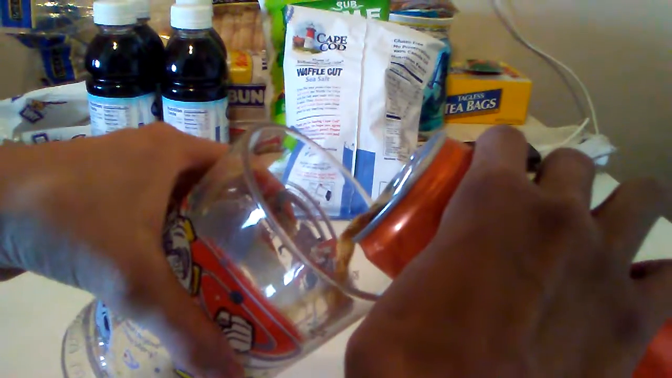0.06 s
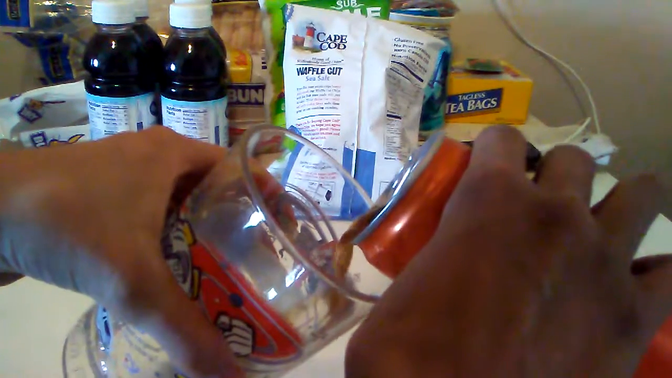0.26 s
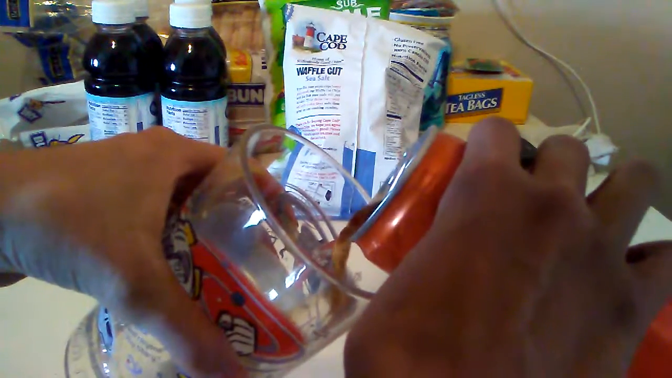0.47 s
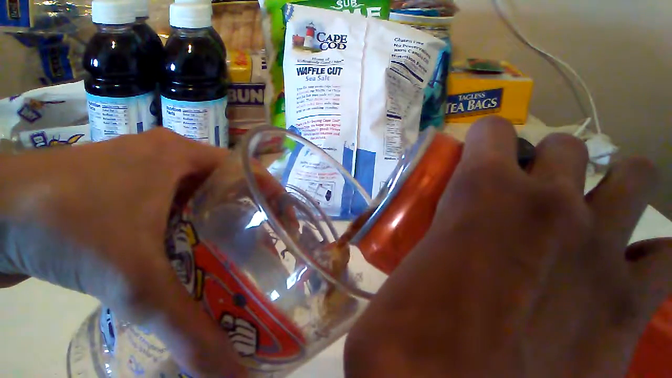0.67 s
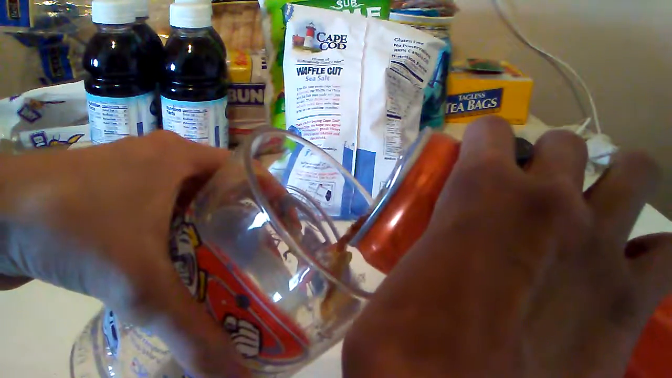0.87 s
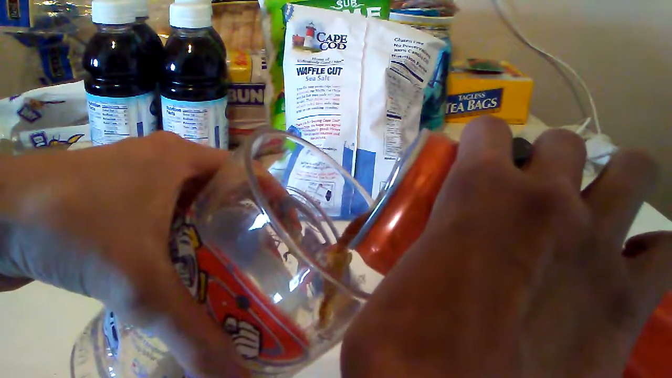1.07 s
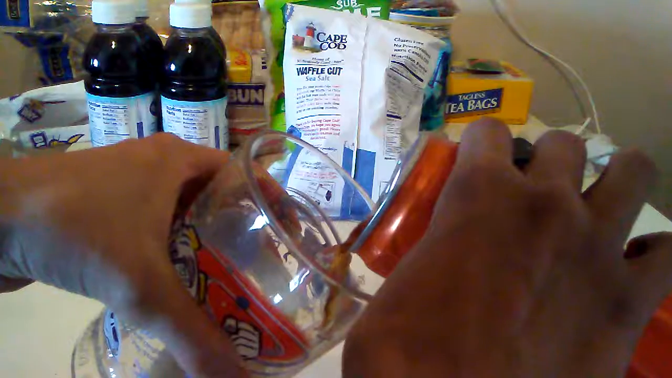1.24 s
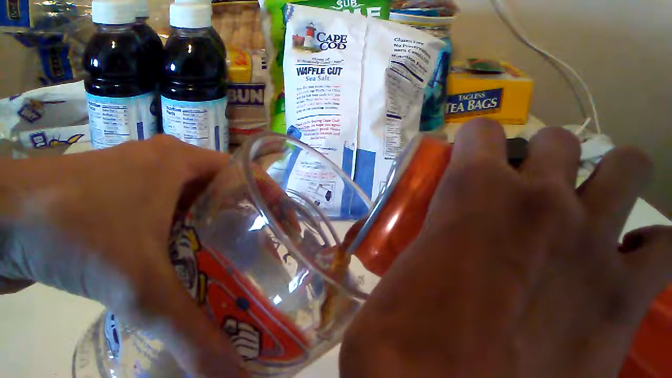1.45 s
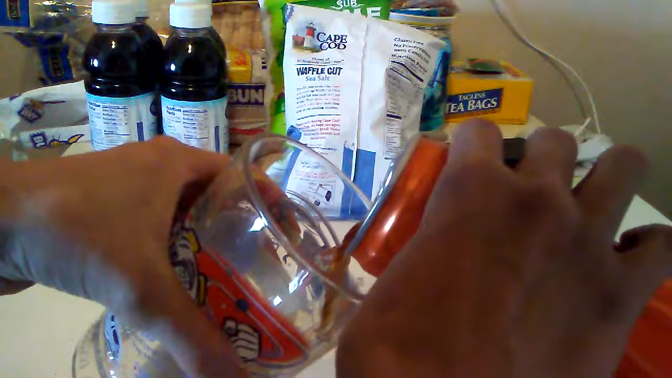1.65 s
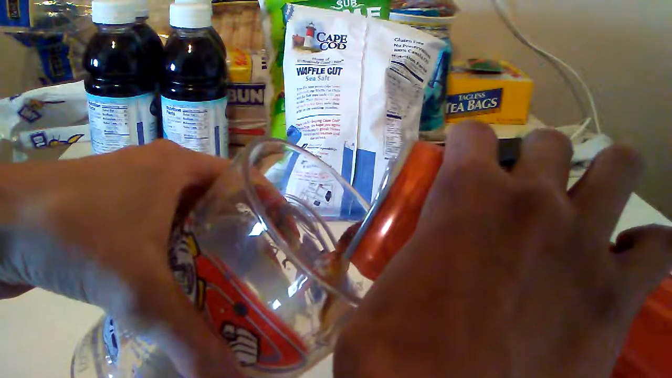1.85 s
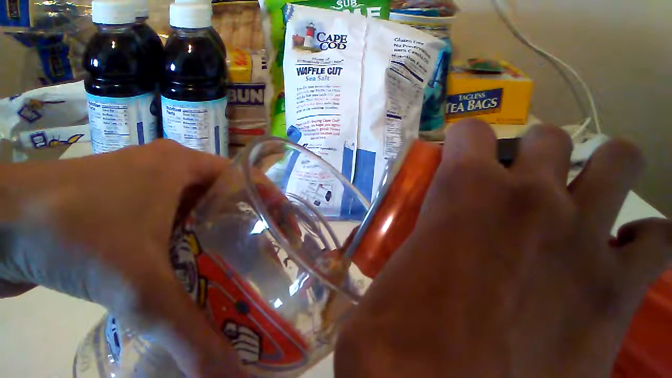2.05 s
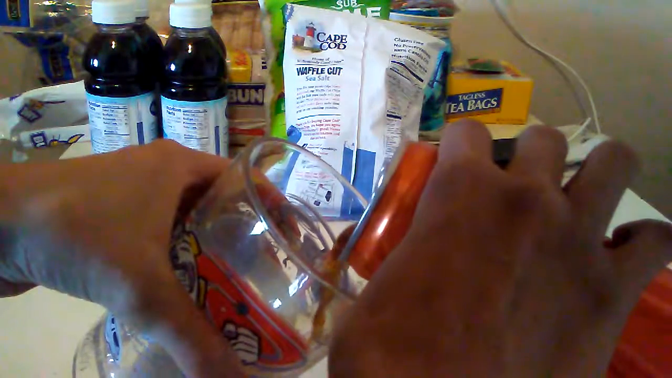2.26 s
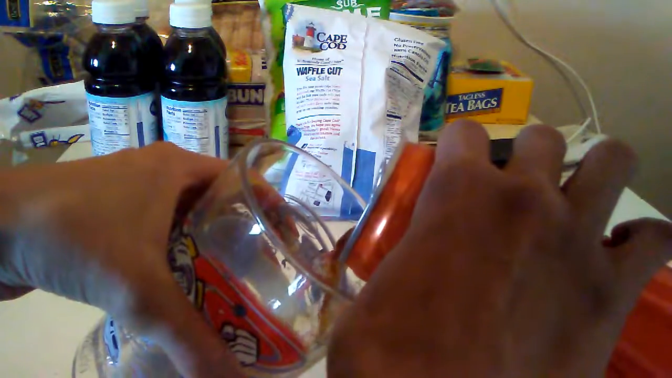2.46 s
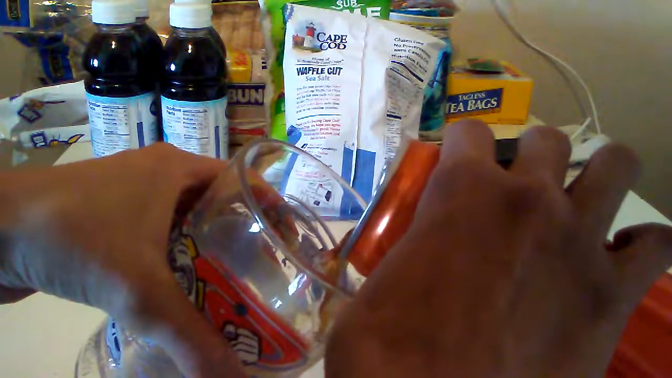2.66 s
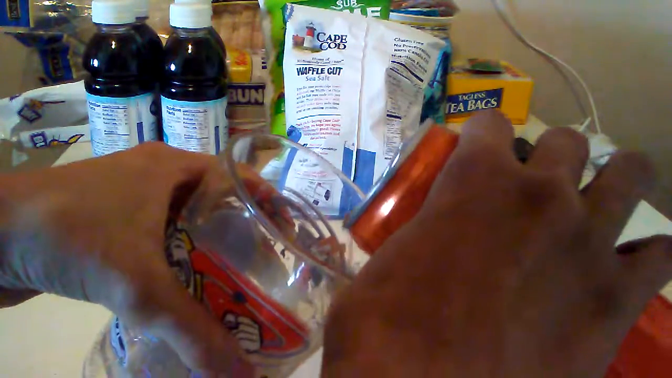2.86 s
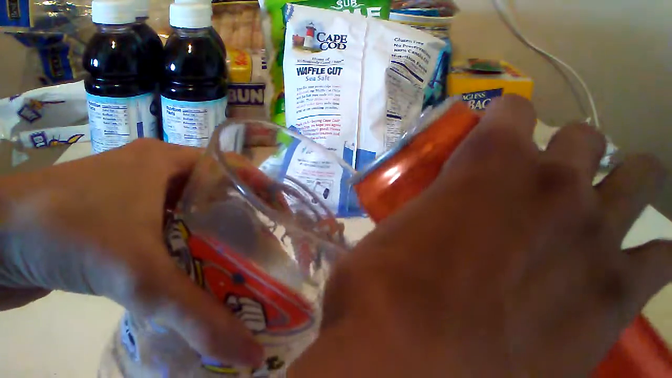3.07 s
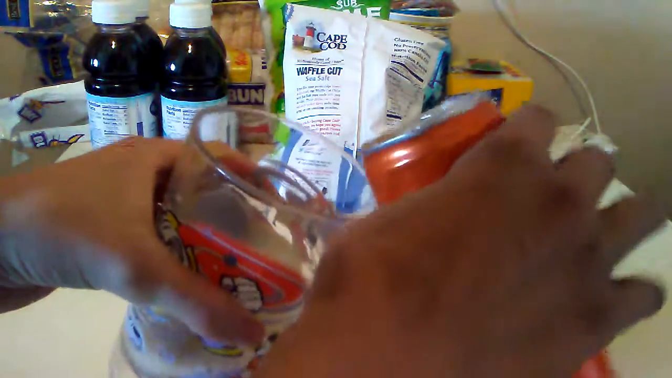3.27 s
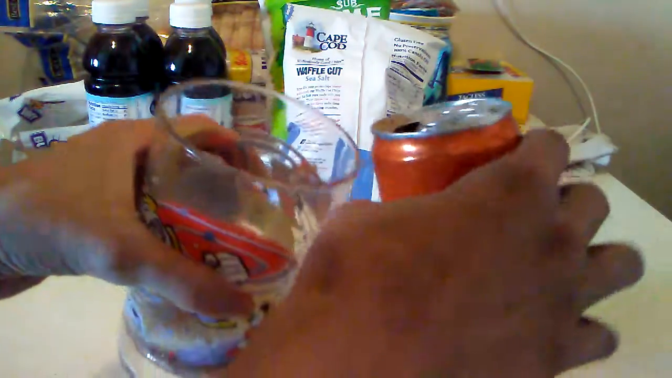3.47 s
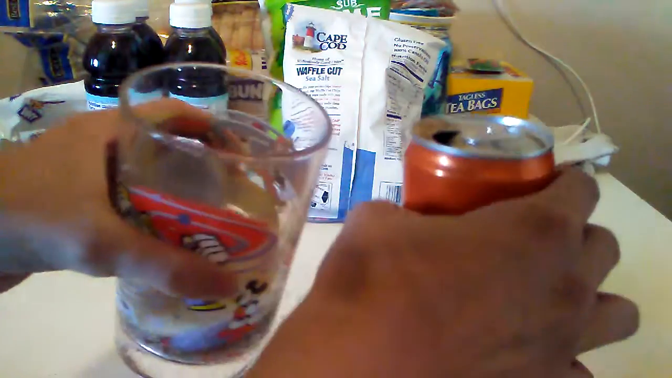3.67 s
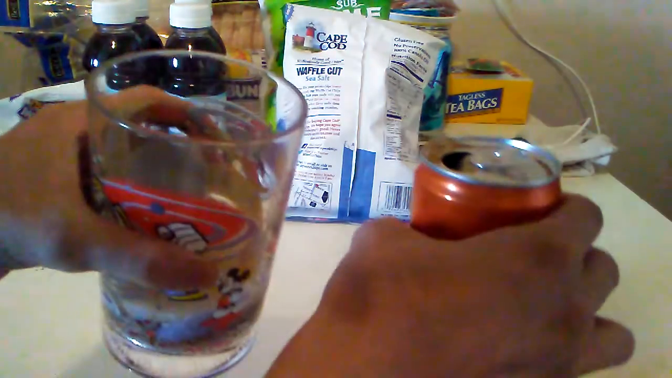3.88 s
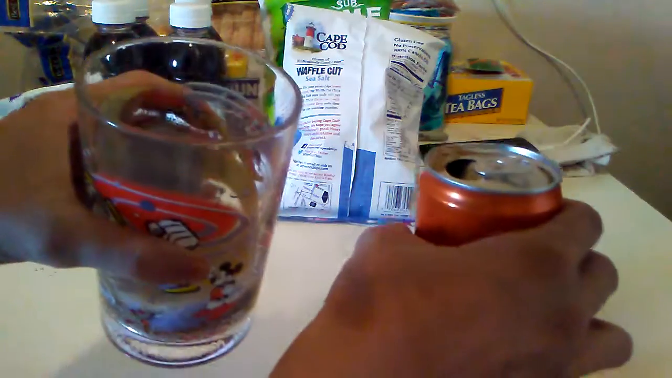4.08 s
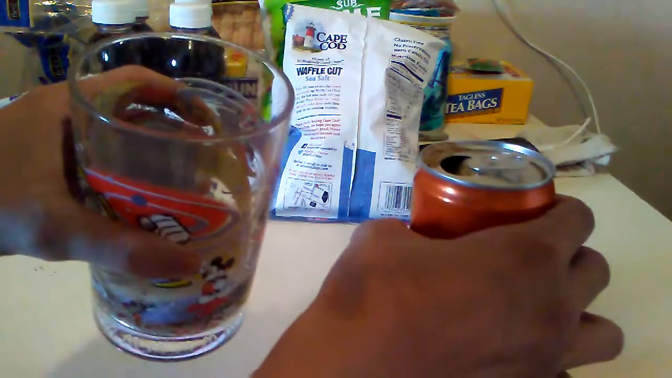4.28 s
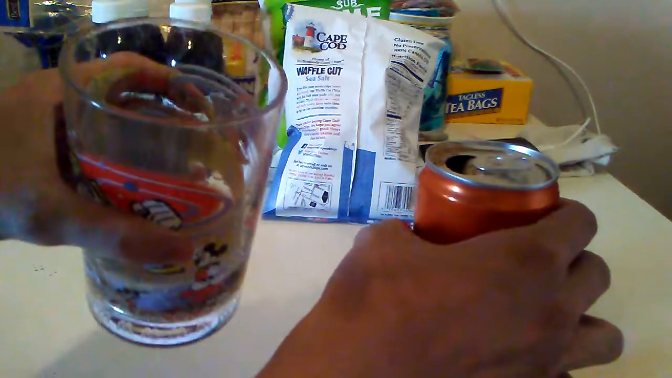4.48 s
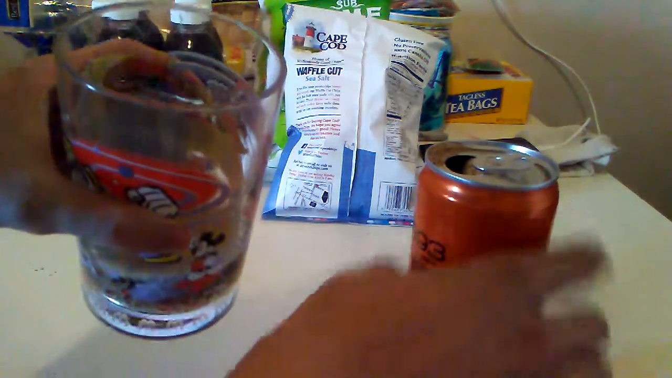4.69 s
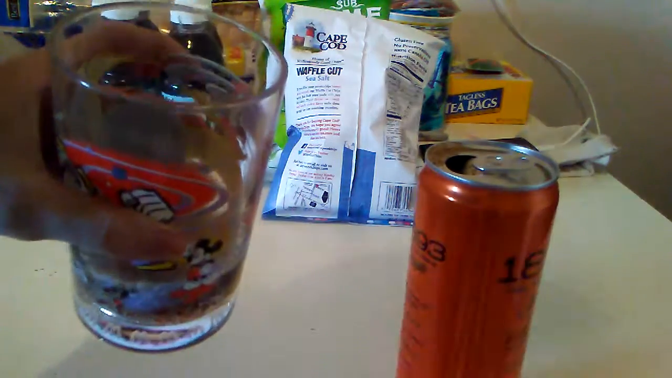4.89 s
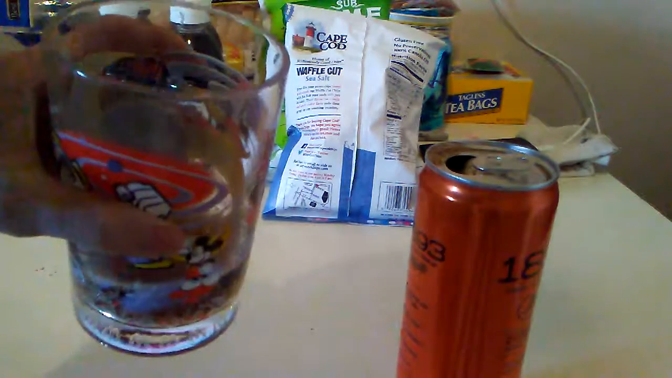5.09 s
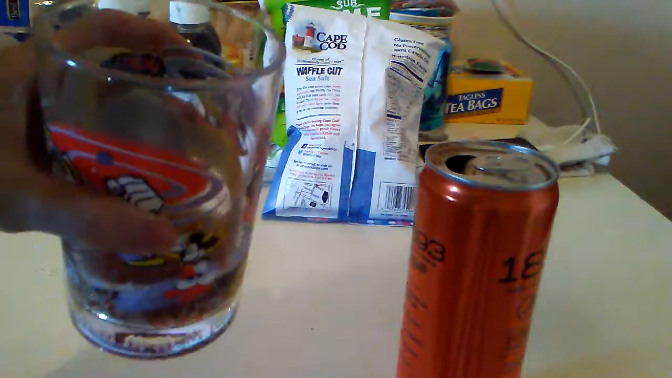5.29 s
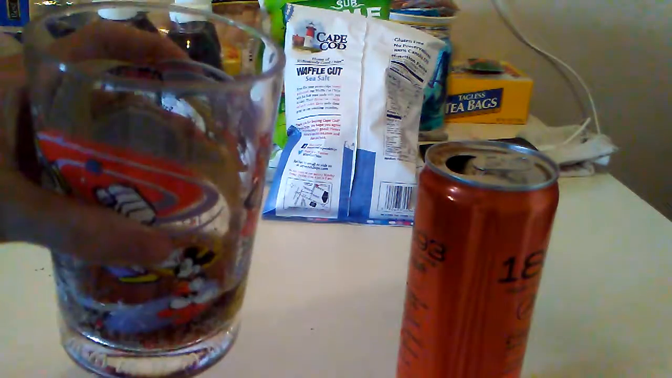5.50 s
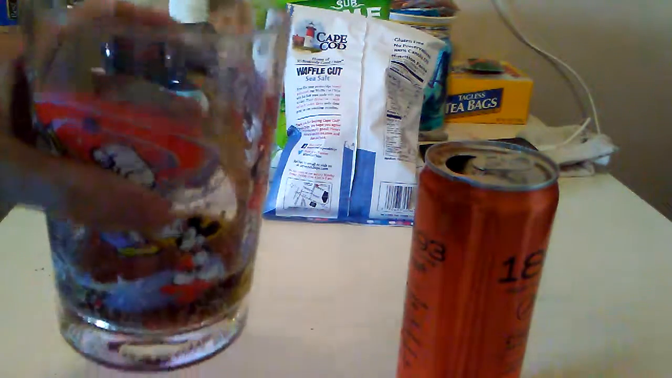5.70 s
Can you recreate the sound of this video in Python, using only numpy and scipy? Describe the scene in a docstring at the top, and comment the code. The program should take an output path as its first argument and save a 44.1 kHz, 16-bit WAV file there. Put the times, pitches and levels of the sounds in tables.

```python
"""Soda fizzing in a glass

Soda runs quietly from a can down the wall of a tilted glass; many tiny bursts sound through the glass's tones.
Air gulps in low tones while pouring; the glass is turned in steps, before and after the can is set down on a
wooden table, where it bounces once: short pushes ring the wood and the can's shell. The can rubs on the table,
and later a hand drags on it. Behind it are the room's echo, a wavering low hum, a rumble, fuzzy drones, air
noise and the whine of a screen, heard by one microphone."""
import sys
import numpy as np
from scipy import signal
from scipy.fft import rfft, irfft, next_fast_len
from scipy.io import wavfile
from scipy.ndimage import uniform_filter1d

SR = 44100
rng = np.random.default_rng(int(sys.argv[2]) if len(sys.argv) > 2 else 0)


def waveform_to_disk(signal):
    """Save audio, clipped to [-1, 1], as 16-bit WAV at the path in sys.argv[1]."""
    frames = np.transpose(np.atleast_2d(signal))
    scaled = np.clip(frames, -1, 1) * 32767
    samples = np.round(scaled).astype(np.int16)
    wavfile.write(sys.argv[1], SR, samples)


N = 253322
TIME = np.arange(N) / SR  # seconds

# Loudness of the foam. Each row: time in seconds, level in dB.
FOAM_LEVEL = [(0, -55.5), (1.1, -55.5), (1.74, -53.5), (2.03, -52), (3.6, -50.5), (4.3, -48.5),
              (4.5, -50.5), (4.95, -50.5), (5.35, -56.5), (5.74, -65.5)]
# Tones of the glass, one list per pose from steeply tilted to upright and at rest.
# Each row of a list: pitch in Hz, width in Hz, relative strength in dB.
GLASS_POSES = [
    [(1440, 114, -3), (1906, 235, 1.5), (2906, 150, 5.5), (3540, 240, 2), (4500, 49, 2.5), (5090, 410, 2),
     (6130, 470, 1.5), (8540, 710, -2.5)],
    [(2015, 140, 1), (2813, 55, 5.5), (3600, 250, -1.5), (4800, 260, 0), (6150, 140, 0), (8900, 270, -5.5)],
    [(2050, 120, -4.5), (2800, 68, 3.5), (3630, 150, 1.5), (4770, 250, -3), (6170, 330, -1),
     (8700, 400, -6)],
    [(1660, 650, -1.5), (2290, 140, 5.5), (2920, 100, -2), (3460, 100, -1.5), (4650, 160, -1),
     (5940, 590, -3), (7920, 120, -7)],
    [(2210, 340, 8), (3110, 380, 6.5), (4300, 74, -1), (4580, 40, 0), (5700, 370, -2), (7890, 140, -20)],
    [(2200, 240, 0.5), (3150, 310, 0), (4480, 300, -1), (5600, 780, 1.5), (7950, 400, -4)],
    [(2190, 160, -7), (2800, 46, -3), (4400, 130, -4), (5900, 480, 0.5), (7900, 98, -5), (8550, 66, -8),
     (9230, 38, -19)],
]
# Foam between those tones. Each row (one per pose): relative level in dB, tilt in dB per octave.
FOAM_BETWEEN_TONES = [(-6, 8), (-3.5, 1.5), (0.5, 1.4), (-10, 5), (-5, 2.5), (-10, 4.5), (-5, 4.5)]
# Each turn carries the glass to its next pose. Each row: start in seconds, length in seconds.
GLASS_TURNS = [(1.7, 0.19), (2.6, 1), (3.453, 0.96), (4.093, 0.32), (4.586, 0.28), (4.905, 0.15)]
# Tone colour of the foam. Each row: frequency in Hz, relative level in dB per Hz.
FOAM_COLOUR = [(650, -82), (1100, -24), (1370, -2), (2500, -2), (2790, -1), (3070, -0.5), (6320, -1.5),
               (8680, -2.5), (15000, -22)]
# Air column over the drink. Each row: pitch in Hz, width in Hz, relative strength in dB.
AIR_COLUMN = [(724, 32, -2), (921, 218, -7.5)]
# The air column grows louder as the glass fills, holds, and fades as the glass is turned further upright.
COLUMN_DB, COLUMN_LEAST_DB = -56, -73.5
FULL_S, FADE_START_S, FILL_DB_PER_S, FADE_DB_PER_S = 3.17, 3.61, 5, 8
# Larger bubbles. Each row: start in seconds, level in dB, first pitch in Hz, ratio between their three tones.
BIG_BUBBLES = [(1.1944, -38, 9600, 0.97), (1.8125, -35, 4500, 1.13)]

# Glass or can meets the table. Each row: start in seconds, level in dB, contact sharpness in Hz,
# share of the free ring time (no unit), clack in dB relative to the wood.
TABLE_KNOCKS = [(.9195, -36, 620, 0.28, -32), (4.152, -41, 600, 0.26, -45),
                (4.168, -13.5, 1900, 0.78, -7.5), (4.376, -22, 1300, 0.85, -23)]
# Tones of the table top. Each row: pitch in Hz, relative strength in dB, free time to drop 60 dB in seconds.
TABLE_TONES = [(136.8, -9, 0.59), (159.5, -22, 0.44), (198.6, -10.5, 0.38), (234, -30, 0.37),
               (255.3, -11, 0.15), (324, -9, 0.32), (364, -21, 0.031), (376.6, -9, 0.34),
               (393.2, -2.5, 0.28), (419.4, -13, 0.44), (443, -9.5, 0.116), (470, -23, 0.13),
               (504, 3, 0.047), (557, -13.5, 0.17), (606, -26, 0.22), (648, -34, 0.17), (713, -20, 0.27),
               (754, -34, 0.31), (790, -7.5, 0.14), (840, -8, 0.12), (887, -15, 0.024), (920, -12, .04),
               (1076, -29, 0.52), (1126, -26, 0.41), (1143, -24, .1), (1304, -23, 0.22)]
# Dense weak tones of the table. Each row: frequency in Hz, relative level in dB per Hz.
TABLE_THUD = [(90, -44), (140, 10), (400, 8.5), (900, -6.5), (1500, -8), (2500, -16), (4000, -42)]
# The can's thin shell, damped by the hand. Each row: pitch in Hz, width in Hz, relative strength in dB.
CAN_SHELL = [(2080, 190, -9.5), (2860, 68, 8.5), (3200, 180, 0.5), (3560, 330, -3), (5450, 130, -13),
             (6050, 230, -6), (7330, 960, -14.5)]
# The can's lid, free of the hand. Each row: pitch in Hz, width in Hz, relative strength in dB.
CAN_LID = [(3420, 74, 5), (5310, 87, -2), (5700, 240, -3)]

# Air gulps into the can. Each row: start in seconds, level in dB, pitch in Hz, time to drop 60 dB in seconds.
AIR_GULPS = [(1.659, -50, 334, 0.31), (1.742, -44.5, 271, 0.086), (1.782, -51, 246, 0.12),
             (1.804, -46, 232, 0.097), (1.98, -49, 248, 0.13), (2.036, -50, 245, 0.14)]
# Rubs on the table: first the can, then a hand as it shifts. Each row: start in seconds, length in seconds,
# level in dB.
TABLE_SLIDES = [(1.657, .16, -63), (4.809, 0.074, -52.5)]
GRIP_DB_PER_S, LIFT_DB_PER_S = 400, 150  # how fast a drag swells and fades

# How the room's echo dies. Each row: frequency in Hz, time to drop 60 dB in seconds.
ECHO_TIMES = [(150, 0.39), (600, 0.62), (2000, 0.57), (8000, 0.086)]
ECHO_DB = -12.5  # relative to the knocks and gulps

# Loudness of the low hum. Each row: time in seconds, level in dB.
HUM_LEVEL = [(0, -57), (.35, -55.5), (.62, -72), (.85, -60), (1.1, -70), (1.33, -54), (1.6, -61),
             (2.1, -57.5), (2.7, -52), (4.3, -52.5), (4.65, -62.5), (5.1, -56.5), (5.74, -59)]
# Fuzzy low tones. Each row: pitch in Hz, level in dB.
FUZZY_DRONES = [(140.0, -66.5), (231.5, -67.5)]
# Tone colour of the room's air. Each row: frequency in Hz, relative level in dB per Hz.
AIR_COLOUR = [(38, -32), (65, -2.5), (86, -13), (263, -15), (365, -18.5), (416, -19), (540, -21),
              (766, -24.5), (1020, -65), (1110, -30.5), (3940, -33.5), (5840, -47), (12000, -65),
              (15600, -82), (22000, -120)]
HUM_HZ, RUMBLE_DB, AIR_DB = 59, -62, -61

# Loudness of the high whine. Each row: time in seconds, level in dB.
WHINE_LEVEL = [(0, -58), (.6, -58.5), (1.7, -68), (1.95, -64), (2.4, -71), (3.1, -67), (3.5, -65),
               (3.67, -60), (3.9, -69), (4.15, -60), (4.55, -71), (4.85, -72), (4.97, -66), (5.74, -62)]
WHINE_HZ, FLICKER_HZ, HISS_DB = 15734.26, 13.01, -78
TOP_HZ = 15830  # nothing is kept from here up


def fizz():
    """The foam sounds through the glass, whose tones shift as it is turned."""
    source = patchy(bursts(rate=6000, spread_db=5.0, mist=1.56), depth_db=0.9)
    pose = sum(np.clip((TIME - start) / length, 0, 1) for start, length in GLASS_TURNS)
    foam = np.zeros(N)
    for k, (tones, (between_db, tilt_db)) in enumerate(zip(GLASS_POSES, FOAM_BETWEEN_TONES)):
        def response(hz):
            open_db = between_db + along(FOAM_COLOUR, hz) + tilt_db * np.log2(hz / 4000 + 0.01)
            return np.sqrt(amp(2 * open_db) + humps(tones, hz))
        share = np.clip(1 - abs(pose - k), 0, 1)  # crossfade between neighbouring poses
        foam += share * unit(filtered(source, response))

    column = bursts(rate=900, spread_db=6.5, mist=1.3)
    column = unit(filtered(column, lambda hz: np.sqrt(humps(AIR_COLUMN, hz))))
    column_db = plateau(COLUMN_DB, FULL_S, FADE_START_S, FILL_DB_PER_S, FADE_DB_PER_S)
    column_db = np.maximum(column_db, COLUMN_LEAST_DB)
    out = amp(curve(FOAM_LEVEL)) * foam + amp(column_db) * column

    t = TIME[:SR // 20]
    for start, db, hz, ratio in BIG_BUBBLES:
        tones = [(hz * ratio ** k, -6, 0.02) for k in range(3)]
        out[round(start * SR):][:len(t)] += amp(db) * ring(tones, t, rise=6.8)
    return out


def bursts(rate, spread_db, mist):
    """Tiny bubbles burst at random, rate per second and unequal in size, over a mist too dense to resolve."""
    when, sign = rng.random((2, N))
    size = amp(spread_db * rng.standard_normal(N))
    clicks = (when < rate / SR) * size * np.sign(sign - 0.5)
    return unit(unit(clicks) + mist * rng.standard_normal(N))


def patchy(x, depth_db):
    """The foam seethes unevenly: random loudness in patches of pitch and time."""
    spectrum = signal.stft(x, nperseg=512)[2]
    field = rng.standard_normal(spectrum.shape)
    field = uniform_filter1d(field, 6, 0)  # smooth over pitch
    field = uniform_filter1d(field, 16, 1)  # smooth over time
    return signal.istft(spectrum * amp(depth_db * unit(field)), nperseg=512)[1][:N]


def knocks():
    """A blow rings the table top, more brightly the shorter the contact, and clacks in the can's shell."""
    out, t = np.zeros(N + SR), TIME[:SR]
    for start, db, sharp_hz, hold, clack_db in TABLE_KNOCKS:
        push = np.hanning(round(SR / sharp_hz) + 2)  # a sharper contact is a shorter push
        thud = noise(lambda hz: amp(along(TABLE_THUD, hz)))[:SR]
        thud = thud * amp(-11.5 - 60 * t / (0.26 * hold))
        wood = ring(TABLE_TONES, t, hold, rise=0.91) + thud
        wood = np.convolve(wood, push / push.sum())[:SR]

        # the shell's tones stand over a faint wide floor
        shell = noise(lambda hz: np.sqrt(humps(CAN_SHELL, hz) + amp(-46) / (1 + (hz / 7000) ** 12)))[:SR]
        lid = noise(lambda hz: np.sqrt(humps(CAN_LID, hz)))[:SR]
        clack = shell * amp(-60 * t / 0.043) + lid * amp(-19 - 60 * t / 0.31)  # the lid rings on
        clack = clack * (1 - np.exp(-t / 0.00044))  # brief soft start
        out[round(start * SR):][:SR] += amp(db) * (wood + amp(clack_db) * clack)
    # a table top radiates little deep bass
    return filtered(out[:N], lambda hz: (1j * hz / (95 + 1j * hz)) ** 2)


def glugs():
    """Each gulp of air is one large bubble: a low tone with a soft start that soon dies."""
    out, t = np.zeros(N), TIME[:SR // 4]
    for start, db, hz, t60 in AIR_GULPS:
        out[round(start * SR):][:len(t)] -= amp(db) * ring([(hz, 0, t60)], t, rise=0.14)
    return out


def slide():
    """Rubbing on the table keeps its longer-ringing tones sounding."""
    level = sum(amp(plateau(db, start, start + length, GRIP_DB_PER_S, LIFT_DB_PER_S))
                for start, length, db in TABLE_SLIDES)
    lift = [(130, 13.5), (400, 6.5), (800, 0.5)]  # Hz, dB: rubbing favours the low tones
    # a tone that dies sooner is wider
    rubbed = [(hz, 9 / t60, db + along(lift, hz)) for hz, db, t60 in TABLE_TONES if t60 > 0.06]
    return level * noise(lambda hz: np.sqrt(humps(rubbed, hz)))


def walls(x):
    """The room answers with a noise tail in which each frequency dies at its own speed."""
    hz, t, spectrum = signal.stft(rng.standard_normal(SR // 2), SR, nperseg=256)
    fade = amp(-60 * t / along(ECHO_TIMES, hz)[:, None])
    tail = signal.istft(spectrum * fade, SR, nperseg=256)[1]
    delayed = np.pad(x, (300, 0))  # in samples, about 7 ms
    return signal.fftconvolve(delayed, tail / np.linalg.norm(tail))[:N]


def room_tone():
    """A low hum that swells and sinks, a rumble under it, two fuzzy drones and the air of the room."""
    hum = amp(curve(HUM_LEVEL)) * np.sqrt(2) * np.sin(2 * np.pi * HUM_HZ * TIME)
    rumble = amp(RUMBLE_DB) * noise(lambda hz: np.sqrt(humps([(41, 3.4, 0)], hz)))
    drones = sum(amp(db) * noise(lambda f: np.sqrt(humps([(hz, 16, 0)], f))) for hz, db in FUZZY_DRONES)
    air = amp(AIR_DB) * noise(lambda hz: amp(along(AIR_COLOUR, hz)))
    return hum + rumble + drones + air


def screen():
    """A high whine, with a weaker fading tone and a thin hiss."""
    turn = 2 * np.pi * WHINE_HZ * TIME
    flicker = 2 * np.pi * FLICKER_HZ * (TIME - 0.0355)
    whine = np.cos(turn) + amp(-5) * np.cos(turn + flicker)  # the level flickers 13 times a second
    faint = amp(-22 - 4 * TIME) * np.cos(2 * np.pi * 14002 * TIME)
    hiss_colour = [(9000, -5), (12000, -10), (14500, -21.0), (16000, 0.0)]  # Hz, relative dB per Hz
    hiss = noise(lambda hz: amp(along(hiss_colour, hz)))
    return amp(curve(WHINE_LEVEL)) * (unit(whine) + faint) + amp(HISS_DB) * hiss


def ring(modes, t, hold=1, rise=0.26):
    """Dying tones, struck at slightly new strengths; each builds up over rise cycles."""
    scatter_db = 1.5 * rng.standard_normal(len(modes))
    out = np.zeros(len(t))
    for (hz, db, t60), extra_db in zip(modes, scatter_db):
        decay = amp(db + extra_db - 60 * t / (hold * t60))
        out += decay * np.sin(2 * np.pi * hz * t) * (1 - np.exp(-t * hz / rise))
    return out


def noise(response):
    """Random noise coloured by a response, at an average (RMS) level of one."""
    return unit(filtered(rng.standard_normal(N), response))


def humps(modes, hz):
    """Power of a set of resonances, each applied twice so that its skirts are steep."""
    return sum(amp(2 * db) / (1 + ((hz - centre) / width) ** 2) ** 2 for centre, width, db in modes)


def filtered(x, response):
    """Shape the spectrum of x by a response given for each frequency."""
    m = next_fast_len(N + SR // 2)
    return irfft(rfft(x, m) * response(np.fft.rfftfreq(m, 1 / SR)), m)[..., :N]


def plateau(db, start, end, rise, fall):
    """A level in dB that climbs, holds from start to end and falls away; slopes in dB a second."""
    return db - rise * np.clip(start - TIME, 0, None) - fall * np.clip(TIME - end, 0, None)


def curve(rows):
    """Join (seconds, value) points by straight lines, one value per sample."""
    return np.interp(TIME, *np.transpose(rows))


def along(points, hz):
    """Join (Hz, value) points by lines that are straight on a log frequency axis."""
    f, v = np.transpose(points)
    return np.interp(np.log(hz + 1), np.log(f + 1), v)


def amp(db):
    """Turn decibels into a plain gain."""
    return 10 ** (np.asarray(db) / 20)


def unit(x):
    """Scale to an average (RMS) level of one."""
    return x / np.sqrt(np.mean(x ** 2) + 1e-20)


def scene():
    """Add all sources; the knocks and gulps also echo in the room. Both channels are the same."""
    hits = knocks() + glugs()
    echo = amp(ECHO_DB) * walls(hits)
    mono = fizz() + hits + echo + slide() + room_tone() + screen()
    return np.array([mono, mono])


def record(dry):
    """Nothing is kept above the band limit."""
    return filtered(dry, lambda hz: hz < TOP_HZ)


dry = scene()
out = record(dry)
waveform_to_disk(out)
```